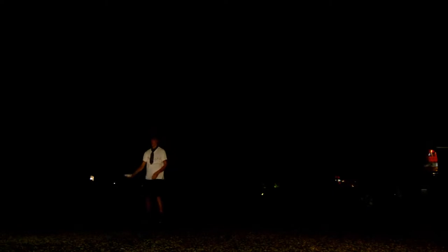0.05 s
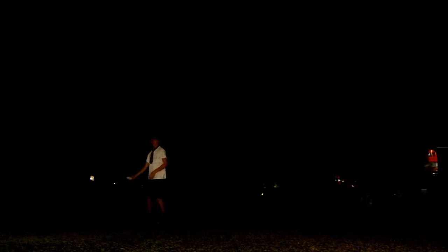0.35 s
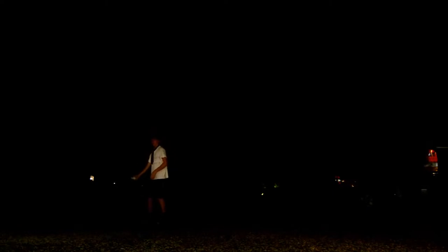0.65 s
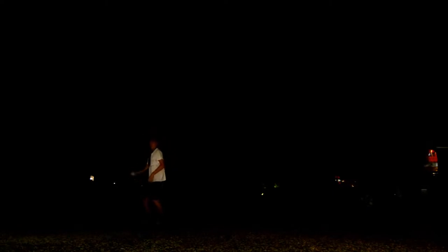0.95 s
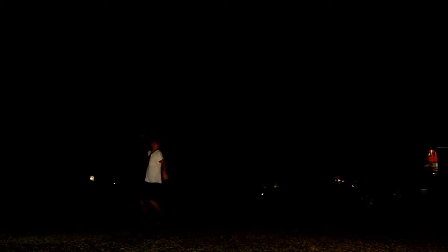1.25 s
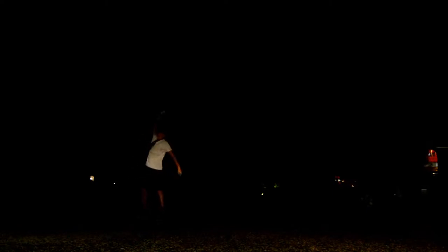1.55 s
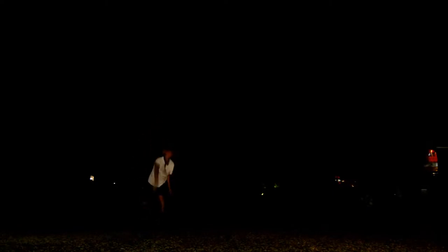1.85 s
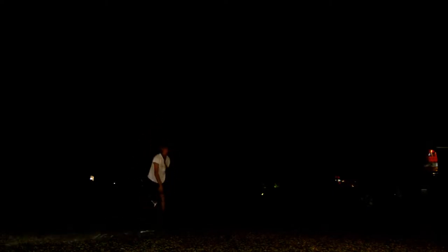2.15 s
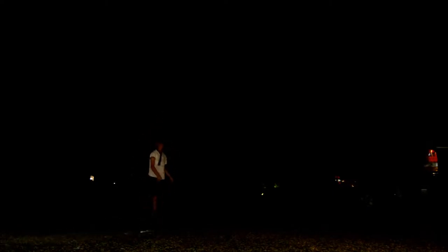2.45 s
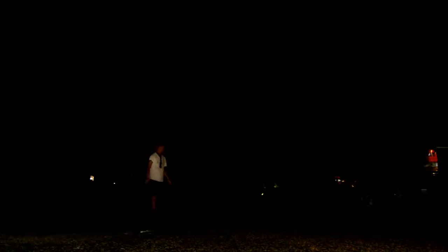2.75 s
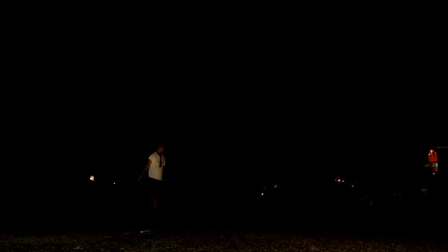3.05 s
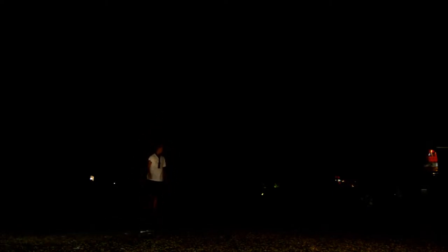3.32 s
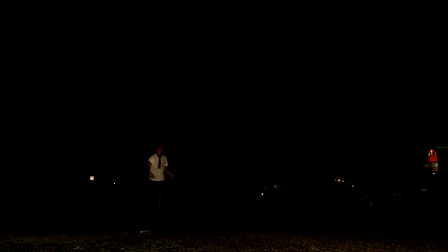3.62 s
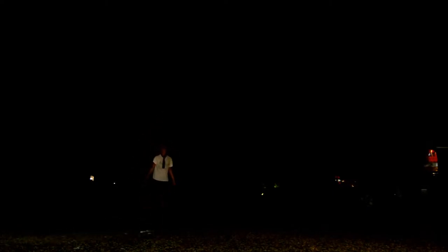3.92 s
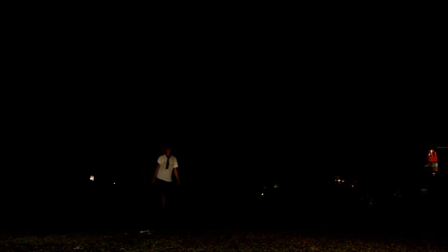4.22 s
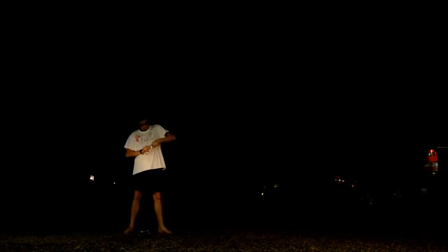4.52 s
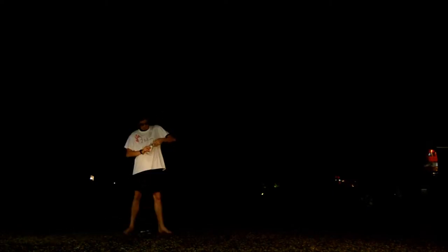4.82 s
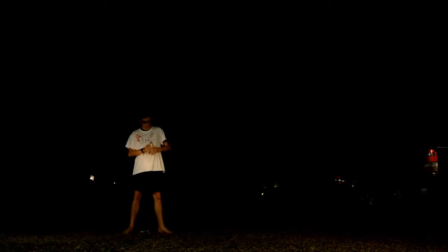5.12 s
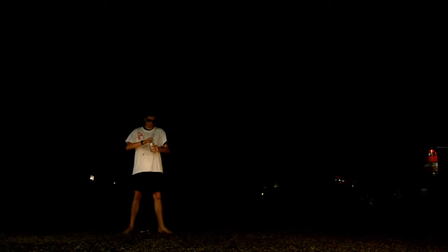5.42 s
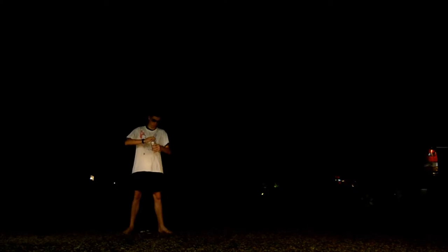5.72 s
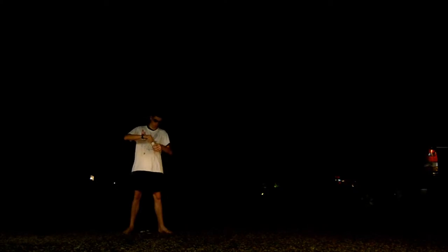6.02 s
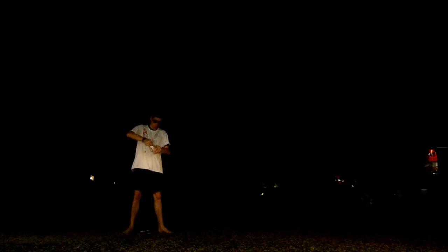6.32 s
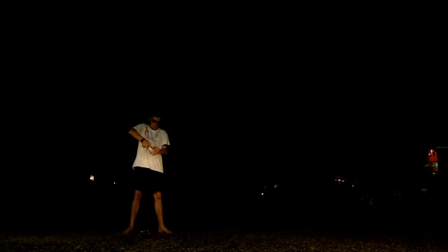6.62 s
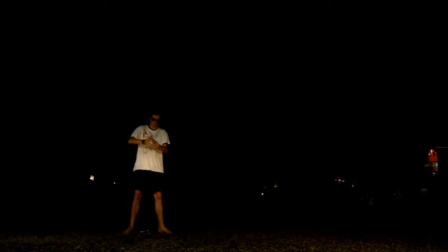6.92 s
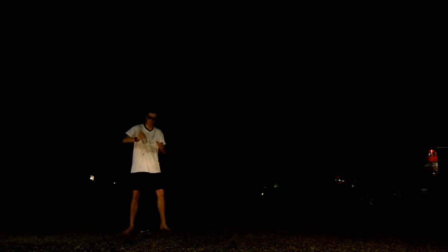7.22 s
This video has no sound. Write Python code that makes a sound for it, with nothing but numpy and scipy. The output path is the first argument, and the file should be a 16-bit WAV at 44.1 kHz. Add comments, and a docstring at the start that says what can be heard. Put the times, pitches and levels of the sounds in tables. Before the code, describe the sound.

A plastic bottle is flung onto gravel outdoors and explodes with a sharp crack, overloading the microphone and echoing off the surroundings. The empty bottle lands with hard, hollow clacks and tumbles away over a faint fizz. Following a tiny gap in the sound, another bottle gives a few crackles and snaps while being twisted. Low and high choruses of crickets carry on throughout, with faint distant town noise beneath.

```python
"""Night in an open yard: a plastic bottle under pressure is flung down and bursts, and the surroundings throw the bang back.
The empty shell lands, bounces and rolls out; after a short break in the sound a second bottle creaks as it is twisted.
Choruses of crickets trill throughout over a faint mains hum."""
import sys
import numpy as np
from scipy import signal
from scipy.fft import rfft, irfft, next_fast_len
from scipy.io import wavfile
from scipy.ndimage import map_coordinates

SR = 44100
rng = np.random.default_rng(int(sys.argv[2]) if len(sys.argv) > 2 else 0)


def to_wav(s):
    """Save 16-bit WAV."""
    ch = np.atleast_2d(s).T  # columns
    pcm = np.round(np.clip(ch, -1, 1) * 32767)  # PCM
    wavfile.write(sys.argv[1], SR, pcm.astype(np.int16))


N = 324576

# the bang and its strongest echo: (s, level dB, t60 s, treble dB)
BLAST = [(1.919, 2.5, 0.016, 9), (1.9242, 2.5, 0.011, 7.5), (1.9529, -8, 0.024, 0)]
BANG = [(30, -26), (130, -18.5), (280, -6.5), (700, 1), (1300, 3), (2400, 0), (4000, -7), (7500, -12.5), (9500, -10.5), (11500, -42)]  # (Hz, dB per Hz)
ROAR = [(60, -28), (190, -23.5), (300, -16), (440, -15), (620, 5), (820, -0.5), (1090, 2.5), (1650, -7), (2350, -4), (3600, -13.5), (7000, -22.5), (8800, -18.5), (10200, -22.5), (11500, -39.5)]  # the bang's echoes: (Hz, dB per Hz)
ROAR_LIFE = [(150, 0.37), (600, 0.36), (1200, 0.41), (3000, 0.6), (9000, 0.49)]  # (Hz, t60 s)
# the flying shell hits the ground: (s, level dB, ring Hz, crack dB, echo dB)
BOUNCES = [(2.0897, -14, 3100, 5, -16), (2.0944, -7.5, 3270, -0.5, -8), (2.3193, -1, 2800, -8, -4.5), (2.5419, -29.5, 2650, 4, -5), (2.762, -31.5, 2850, -3.5, 1.5), (3.0926, -23, 3040, -5, -1.5)]
SHELL = [(0.119, -47), (.33, -32), (0.499, -16.5), (.7, -12.5), (.88, -4.5), (1.019, 1.5), (1.14, -3.5), (1.298, -16.5), (1.8, -20), (3, -43)]  # the wall's resonance: (ratio to the ring, dB per Hz)
# dull knocks of feet and bottle: (s, scuff dB, hollow note dB, note Hz)
KNOCKS = [(0.024, -43, -36.5, 542), (1.214, -40.5, -48, 1150), (1.742, -39, -40.5, 850), (2.403, -35, -38, 825), (3.450, -39.5, -45, 826), (3.778, -45, -34.5, 604), (4.905, -45, -42, 642), (5.125, -63, -48.5, 325)]
# stiff plastic snaps in the hands: (s, edge dB, flipping panel dB)
SNAPS = [(0.0244, -37.5, -27), (0.2064, -41, -56), (4.8993, -46, -55), (5.4939, -52, -52), (5.602, -37, -45.5), (5.624, -38, -54), (5.765, -25, -30), (7.1786, -37.5, -61), (7.2498, -41, -54)]
SNAP_BODY = [(60, -13), (180, -9), (320, -0.5), (600, 4.5), (1100, -2), (2200, -5), (4500, -18), (7000, -48)]  # (Hz, dB per Hz)
SNAP_EDGE = [(300, -47.5), (1500, -9), (4000, -4), (6000, -11), (7200, 0), (8500, -2.5), (10300, -6.5), (11500, -26)]  # (Hz, dB per Hz)
YARD = [(200, 0.9), (1000, 0.3), (3000, 0.4), (9000, 0.25)]  # (Hz, t60 s)
GRAINS = [(300, -1), (900, 9.5), (2000, 4.5), (3300, 9), (4500, -12.5), (7000, -1), (8900, 3.5), (11500, -11)]  # (Hz, dB per Hz)
LOW_SONG = [(1800, -61.5), (2080, -17), (2240, -3.5), (2390, -12.5), (2520, -1), (2630, 4.5), (2720, 0.5), (2850, -12), (3200, -63)]  # (Hz, dB per Hz)
HIGH_SONG = [(4000, -48), (4500, -24), (4850, -8.5), (5080, 1), (5260, 2), (5400, -2), (5600, -18), (6200, -21), (6800, -56.5), (9000, -59), (10200, -32.5), (11200, -52)]  # (Hz, dB per Hz)
AIR = [(25, -15), (60, -4), (120, -1), (300, -2), (500, -5.5), (1200, -7), (2000, -8.5), (4000, -14.5), (6500, -13.5), (8000, -34), (10500, -26), (11500, -55)]  # (Hz, dB per Hz)
HUM = [(120, -66), (240, -64.5)]  # (Hz, dB)
BREAK = (4.536, 4.582)  # fixed
TOP_HZ = 11200  # fixed
TIME = np.arange(N) / SR
AGE = np.arange(int(SR * .9)) / SR  # fixed
LOW_DB = -49  # level of the low crickets (dB)
SCUFF = [(150, -25), (500, -2.5), (1000, 3), (1700, -3.5), (4000, -26.5)]  # (Hz, dB per Hz)
MICROPHONE = [(7400, 0), (7950, -4), (8400, -1)]  # a narrow treble dip: (Hz, dB)
# a faint insect buzzes very high: (middle s, length s, Hz, dB)
BUZZES = [(.6, .45, 9940, -74), (4.85, 0.42, 10160, -80), (6.02, 0.51, 10000, -77)]
THUMP = [(30, 2), (200, 1), (500, -3), (1000, -16), (3000, -31)]  # the air pushed from under the shell: (Hz, dB per Hz)
BOUNCE_T60 = 0.0056  # length of a landing's contact (s)
REBOUND_S, REBOUND_DB = .0066, -14  # the shell's other end slaps down just after
# the shell tumbles along and rolls out, bump by bump: (s, level dB)
BUMPS = [(2.855, -37.5), (2.927, -24.5), (2.958, -33), (3.018, -27), (3.086, -34), (3.131, -31), (3.321, -25), (3.484, -29), (3.670, -31), (3.766, -30), (3.852, -28), (3.917, -29.5), (3.968, -33.5)]
ROLL_HZ, ROLL_T60 = 3053, 0.021  # ring and contact length (s) while it still tumbles briskly
STALL_S, STALL_SAG_HZ, STALL_T60 = .21, 880, 0.044  # time constant of the stall; by the last bump the ring is this much lower, the contact this much longer (s)
ROLL_CRACK_DB, DULLING_DB_PER_S, CRACK_DB_PER_DB = -4.5, 18, 0.3  # crack of the hardest bump; slower and weaker bumps are duller
ROLL_ECHO_DB = 0.5
KNOCK_T60 = .04  # length of a knock's scuff (s)
# feet shuffle on the gravel: (middle s, length s, level dB)
SHUFFLES = [(.175, 0.11, -54.5), (1.638, 0.12, -56), (1.822, 0.19, -52.5), (7.28, .3, -61.5)]
SHUFFLE_GRIT_DB = -4  # gravel crackle over the dull scuff
SNAP_RING_HZ, SNAP_RING_DB, SNAP_ECHO_DB = 3500, 1, -4  # the wall's ring over the panel's body; the yard's answer
CRINKLES_PER_S, CRINKLE_DB, CRINKLE_SPREAD_DB = 4, -53, 5  # faint ticks while the second bottle is twisted
CLICK = (-37, -29, -28, 2180, -12)  # a dry click just before the break: (edge dB, body dB, ring dB, ring Hz, echo dB)
# after the burst, drops patter down and the puddle fizzes on: (level at the burst dB, fall dB per s)
SPRAY = [(-38, 22), (-53.5, 2.5)]
GRIT_DB = -68  # faint crackle that is always there
HIGH_DB = -44.5  # mean level of the high crickets (dB)
SURGE_BEFORE, SURGE_AFTER = (1.574, .46), (4.858, 0.573)  # the high chorus surges in a regular beat, before and after the break: (one crest s, period s)
# depth of the surges, greatest when the crickets are in step: (s, dB)
SURGE_DEPTH = [(0, 1.5), (1.05, .8), (1.5, 3.5), (2.1, -1), (4.4, -0.5), (4.7, 3), (5.35, 4.3), (6, 0.8), (6.7, 2.5), (7.36, 1.8)]
THUMP_DB = -23  # the thump beside the ring
SOFTENING = 0.047  # growth of a bump's rise time as the roll goes on (s per s)
CRACK = [(300, -46), (1500, -12), (4000, 0.5), (6300, -4.5), (7400, -5), (8600, 0), (9500, -4), (10500, -10.5), (11500, -26)]  # the shell against gravel: (Hz, dB per Hz)
CRINKLE = [(3000, -24), (6000, -14), (7400, 0), (8600, -2), (10000, -13), (11500, -35)]  # (Hz, dB per Hz)
BUZZ_BAND = [(.98, -40), (1, 0), (1.06, -40)]  # fixed
CLICK_S = 4.495  # fixed


def amp(db):
    """Decibels to gain."""
    return 10 ** (np.asarray(db) / 20)


def unit(x):
    """Scaled to rms 1."""
    return x / np.sqrt(np.mean(x ** 2) + 1e-20)


def along(points, hz):
    """(Hz, value) points read on a log axis."""
    f, v = np.transpose(points)
    return np.interp(np.log(hz + 1), np.log(f + 1), v)


def curves(rows):
    """One value per sample for each column after the time."""
    s, *cols = np.transpose(rows)
    return [np.interp(TIME, s, c) for c in cols]


def wobble(rate):
    """A smooth random curve, rate knots a second."""
    return map_coordinates(rng.standard_normal(int(N * rate / SR) + 4), [TIME * rate])


def filtered(x, response):
    """x times a response of frequency."""
    m = next_fast_len(len(x) + 8192)
    return irfft(rfft(x, m) * response(np.fft.rfftfreq(m, 1 / SR)), m)[:len(x)]


def coloured(x, spectrum):
    """x with the given colour, at rms 1."""
    return unit(filtered(x, lambda hz: amp(along(spectrum, hz))))


def fade(t60):
    """An exponential decay."""
    return np.exp(-np.log(1000) * AGE / max(t60, 1e-4))




def dying(x, life):
    """Each frequency of x dies at its own speed."""
    hz, t, z = signal.stft(x, SR, nperseg=256)
    return signal.istft(z * np.exp(-np.log(1000) * t / along(life, hz)[:, None]), SR, nperseg=256)[1][:len(x)]


def yard():
    """Scatter from ground, walls and trees, of energy 1."""
    tail = dying(rng.standard_normal(len(AGE)), YARD) * (1 - fade(0.022)) * (1 + 1.2 * fade(0.063))
    return tail / np.linalg.norm(tail)


def add(track, s, sound):
    """Mix a sound in at time s."""
    part = track[round(s * SR):][:len(sound)]
    part += sound[:len(part)]


def burst():
    """The wall tears in two quick blasts; echoes swell behind them and roll away."""
    out = np.zeros(N)
    for s, db, t60, treble_db in BLAST:
        colour = [(hz, level + treble_db * hz / (hz + 2000)) for hz, level in BANG]
        add(out, s, amp(db) * strike(colour, t60, -12.0))
    near = dying(coloured(rng.standard_normal(len(AGE)), ROAR), ROAR_LIFE) * (1 - fade(0.085))
    far = coloured(rng.standard_normal(len(AGE)), ROAR) * fade(0.88) * (1 - fade(.3))
    add(out, BLAST[0][0], amp(-9) * near + amp(-29.5) * far)
    return out


def bounces():
    """Hard, brief landings, each with a weak rebound."""
    out = np.zeros(N)
    for s, db, ring_hz, crack_db, echo_db in BOUNCES:
        add(out, s, amp(db) * contact(ring_hz, crack_db, BOUNCE_T60, echo_db))
        add(out, s + REBOUND_S, amp(db + REBOUND_DB) * contact(ring_hz, crack_db + 0.5, BOUNCE_T60, echo_db + 2))
    return out


def knocks():
    """Soft contacts: a dull scuff and one damped hollow note."""
    out = np.zeros(N)
    for s, scuff_db, note_db, note_hz in KNOCKS:
        note = np.sin(2 * np.pi * note_hz * AGE) * (fade(0.055) + .15 * fade(0.46))
        add(out, s, (amp(note_db) * note + amp(scuff_db) * strike(SCUFF, KNOCK_T60, -6)) * (1 - fade(KNOCK_T60 / 4)))
    return out


def snaps():
    """The loud snaps of handled bottles, and one dry click."""
    out = np.zeros(N)
    for s, edge_db, panel_db in SNAPS:
        add(out, s, snap(edge_db, panel_db, panel_db + SNAP_RING_DB, SNAP_RING_HZ, SNAP_ECHO_DB))
    add(out, CLICK_S, snap(*CLICK))
    return out




def chorus(song, centre_hz, spread_hz, pulse_hz, blur_db, count):
    """Crickets each pulse on their own pitch; countless farther ones blur into a band."""
    voices = np.zeros(N)
    for pitch, pace, level in rng.standard_normal((count, 3)):
        stroke = 2 * np.pi * np.cumsum(pulse_hz * (1 + .15 * pace + 0.01484 * wobble(3))) / SR
        carrier = centre_hz + spread_hz * (pitch + .5 * np.cos(stroke) + .3 * wobble(60))  # pitch sags within each wing stroke
        voices += amp(2 * level) * np.maximum(np.sin(stroke), 0) * np.sin(2 * np.pi * np.cumsum(carrier) / SR)
    return unit(coloured(voices, song) + amp(blur_db) * coloured(rng.standard_normal(N), song))


def crickets():
    """A steady low chorus and a high one that surges about twice a second."""
    crest_s, period_s = np.where(TIME[:, None] < BREAK[0], SURGE_BEFORE, SURGE_AFTER).T
    depth_db, = curves(SURGE_DEPTH)
    high_db = HIGH_DB + depth_db * np.cos(2 * np.pi * (TIME - crest_s) / period_s)
    low = amp(LOW_DB + 0.27 * wobble(5.0)) * chorus(LOW_SONG, centre_hz=2588, spread_hz=45, pulse_hz=54.46, blur_db=5.5, count=4)
    high = amp(high_db) * chorus(HIGH_SONG, centre_hz=5230, spread_hz=75, pulse_hz=70.6, blur_db=5.5, count=9)
    return low + high


def night():
    """Steady distant town noise and the hum of mains equipment."""
    air = amp(-57.0) * coloured(rng.standard_normal(N), AIR)
    return air + sum(amp(db + wobble(2.92)) * np.sin(2 * np.pi * hz * TIME + .3 * wobble(2.51)) for hz, db in HUM)


def causal(x, spectrum):
    """x through a body of the given colour, which answers only after it is struck."""
    m = 8192  # fixed
    cepstrum = irfft(np.log(amp(along(spectrum, np.fft.rfftfreq(m, 1 / SR)))))
    cepstrum[1:m // 2] *= 2
    cepstrum[m // 2 + 1:] = 0
    return signal.fftconvolve(x, irfft(np.exp(rfft(cepstrum))))[:len(x)]


def shell(ring_hz):
    """The bottle wall's heavily damped resonance at a given pitch."""
    return [(ratio * ring_hz, db) for ratio, db in SHELL]


def strike(spectrum, t60, echo_db):
    """A sharp push, a short rattle of contact and the yard's scatter, all in one body's colour."""
    rattle = rng.standard_normal(len(AGE)) * fade(t60)
    push = signal.unit_impulse(len(AGE))
    sharp = np.exp(-(t60 / 0.008) ** 2)  # brief contacts are nearly a single push
    force = sharp * push + np.sqrt(np.clip(1 - sharp ** 2, 0, 1)) * rattle / np.linalg.norm(rattle)
    sound = causal(force + amp(echo_db) * yard(), spectrum) / np.linalg.norm(causal(push, spectrum))
    return sound * np.linalg.norm(fade(t60))


def buzzes():
    """Thin high buzzes, each a narrow band (ratio to its pitch, dB) that swells and fades."""
    out = np.zeros(N)
    for s, length, hz, db in BUZZES:
        band = coloured(rng.standard_normal(N), [(ratio * hz, level) for ratio, level in BUZZ_BAND])
        out += amp(db) * band * arch(s, length)
    return out


def contact(ring_hz, crack_db, t60, echo_db):
    """The shell on the ground: it cracks, thumps and rings."""
    ring = strike(shell(ring_hz), t60, echo_db)
    crack = amp(crack_db) * strike(CRACK, t60, echo_db + 2.0)
    thump = amp(THUMP_DB) * strike(THUMP, t60, -16)
    return ring + crack + thump


def roll():
    """As the shell slows its bumps grow duller and softer; as it stalls they turn longer and lower."""
    out = np.zeros(N)
    first_s, last_s = BUMPS[0][0], BUMPS[-1][0]
    hardest_db = max(db for s, db in BUMPS)
    for s, db in BUMPS:
        rolled_s, stall = s - first_s, np.exp((s - last_s) / STALL_S)
        crack_db = ROLL_CRACK_DB - DULLING_DB_PER_S * rolled_s + CRACK_DB_PER_DB * (db - hardest_db)
        bump = contact(ROLL_HZ - STALL_SAG_HZ * stall, crack_db, ROLL_T60 + STALL_T60 * stall, ROLL_ECHO_DB)
        add(out, s, amp(db) * bump * (1 - fade(SOFTENING * rolled_s)))
    return out


def snap(edge_db, body_db, ring_db, ring_hz, echo_db):
    """Buckling plastic: a bright edge, with body and wall ring when a whole panel flips."""
    return (amp(edge_db) * strike(SNAP_EDGE, 0.0086, echo_db) + amp(body_db) * strike(SNAP_BODY, 0.01, echo_db)
            + amp(ring_db) * strike(shell(ring_hz), 0.015, echo_db))


def crinkles():
    """The twisted bottle ticks faintly at random moments after the break."""
    out = np.zeros(N)
    span = N / SR - BREAK[1]
    for when, size in rng.random((round(CRINKLES_PER_S * span), 2)):
        add(out, BREAK[1] + when * span, amp(CRINKLE_DB + CRINKLE_SPREAD_DB * (2 * size - 1)) * strike(CRINKLE, .008, -8))
    return out


def crackle():
    """Dense tiny ticks of uneven size, at rms 1."""
    sizes = np.exp(0.87 * np.minimum(rng.standard_normal(N), 2)) * amp(2.2 * wobble(40))
    return coloured(sizes * rng.standard_normal(N), GRAINS)


def spray():
    """Drops and fizz crackle from the burst to the break, dying away into the ever-present grit."""
    age = TIME - BLAST[0][0]
    wet = (age > 0) & (TIME < BREAK[0])
    power = sum(amp(db - fall * np.abs(age)) ** 2 for db, fall in SPRAY)
    return np.sqrt(wet * power + amp(GRIT_DB) ** 2) * crackle()


def arch(middle_s, length_s):
    """A smooth rise and fall."""
    return np.cos(np.pi * np.clip((TIME - middle_s) / length_s, -.5, .5))


def shuffles():
    """Each slide of a foot scuffs the ground and stirs the gravel."""
    pressure = sum(amp(db) * arch(s, length) for s, length, db in SHUFFLES)
    return pressure * (coloured(rng.standard_normal(N), SCUFF) + amp(SHUFFLE_GRIT_DB) * crackle())


def scene():
    """Everything at one microphone."""
    bottles = burst() + spray() + bounces() + roll() + snaps() + crinkles()
    return (bottles + knocks() + shuffles() + crickets() + buzzes() + night())[None]


def record(dry):
    """The microphone colours the sound and the bang overloads it; the sound breaks off for an instant; the band is limited."""
    running = (TIME < BREAK[0]) | (TIME > BREAK[1])
    low_cut = signal.butter(1, 40, "high", fs=SR, output="sos")  # fixed
    x = signal.sosfilt(low_cut, np.clip(causal(dry[0], MICROPHONE), -1, 1)) * running
    return filtered(x, lambda hz: 1 / np.sqrt(1 + (hz / TOP_HZ) ** 70))[None]  # fixed


dry = scene()
out = record(dry)
to_wav(out)
```